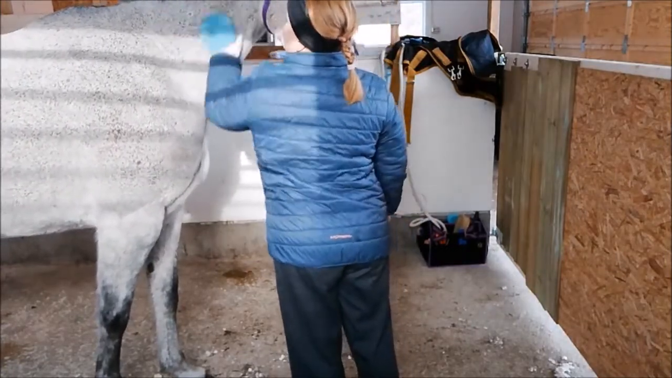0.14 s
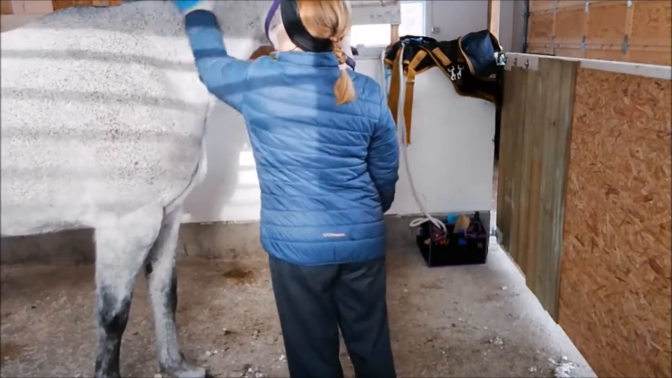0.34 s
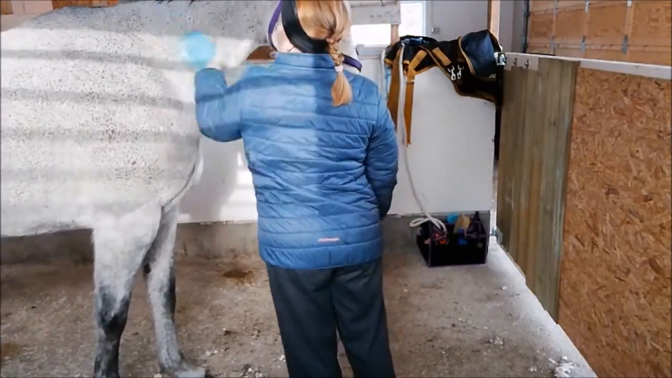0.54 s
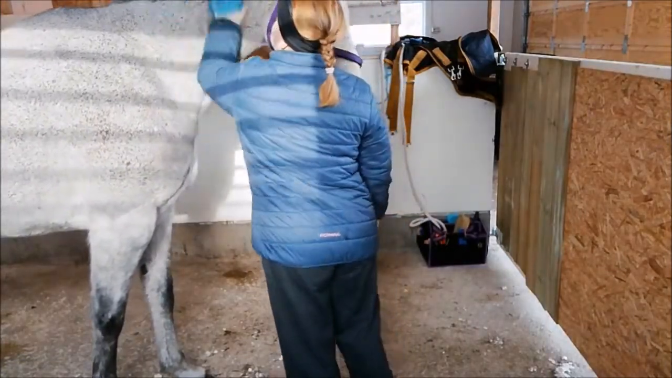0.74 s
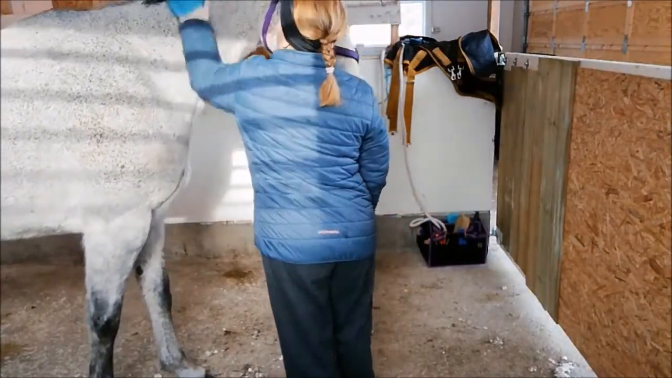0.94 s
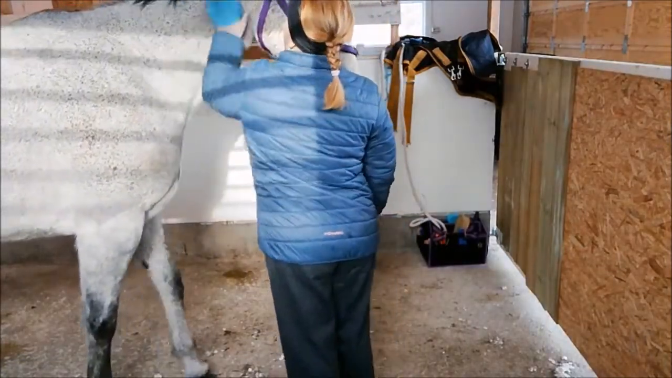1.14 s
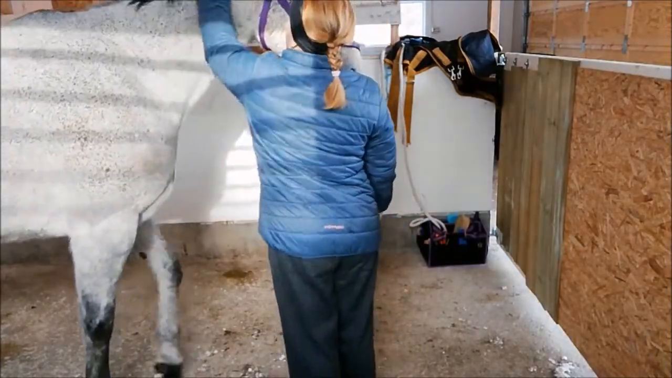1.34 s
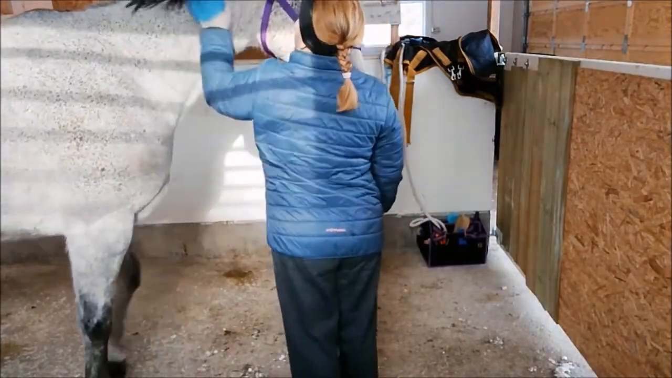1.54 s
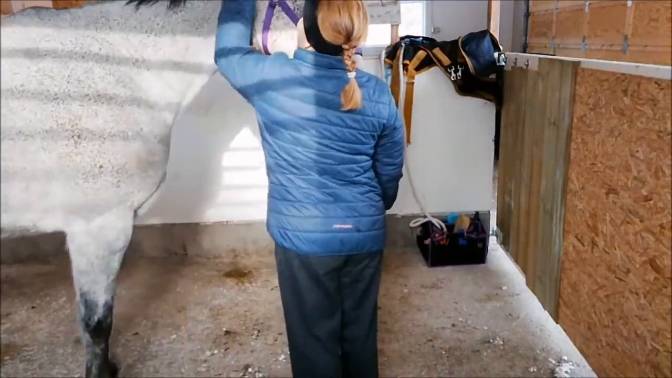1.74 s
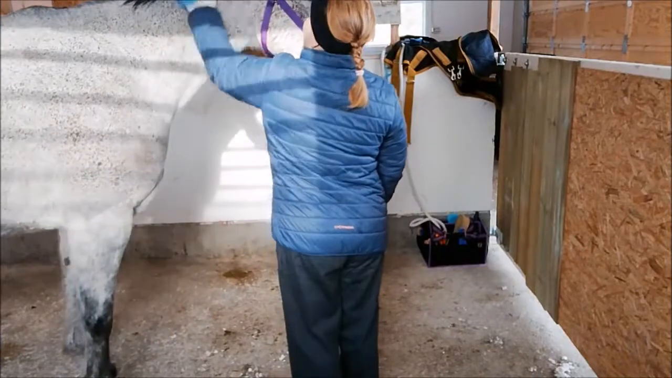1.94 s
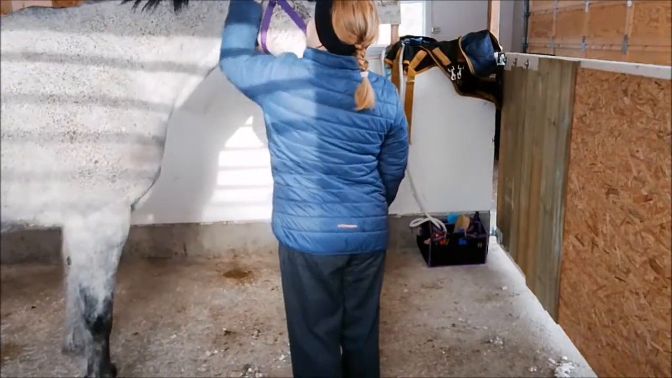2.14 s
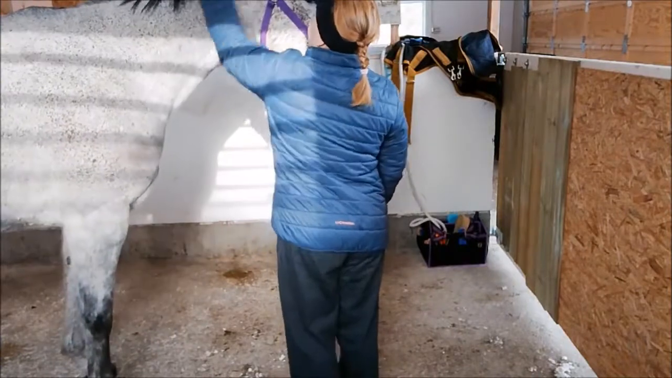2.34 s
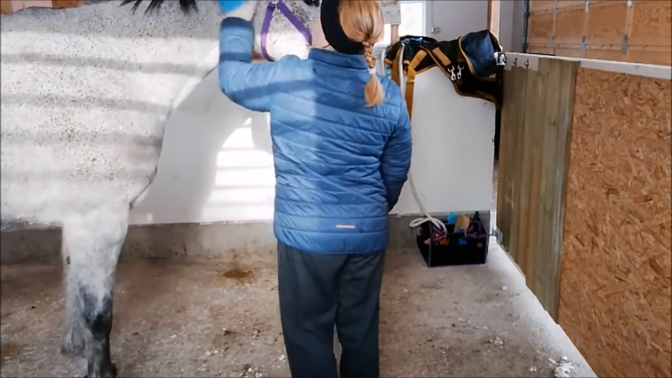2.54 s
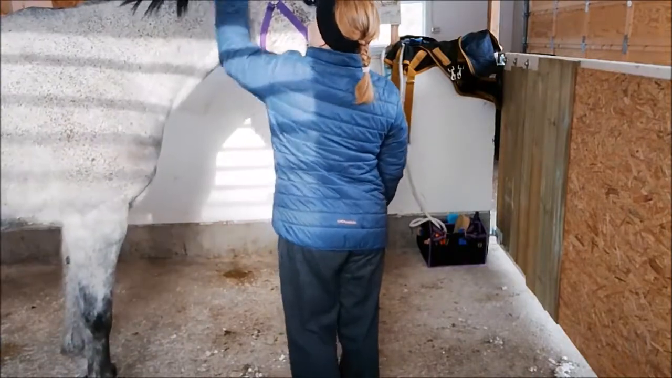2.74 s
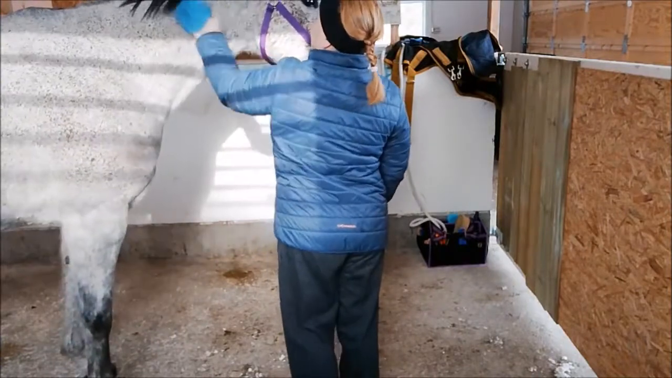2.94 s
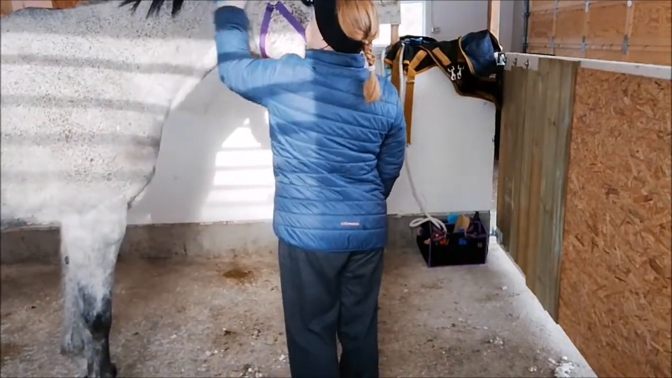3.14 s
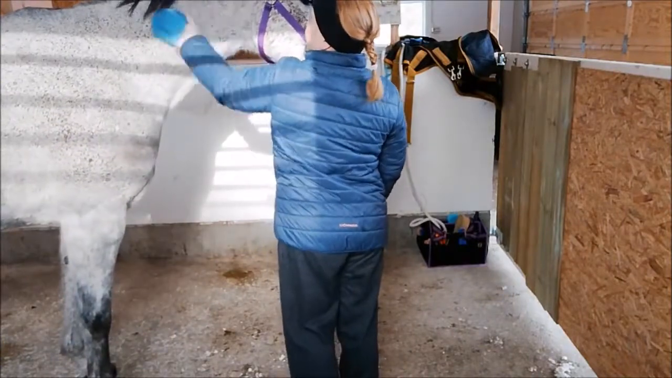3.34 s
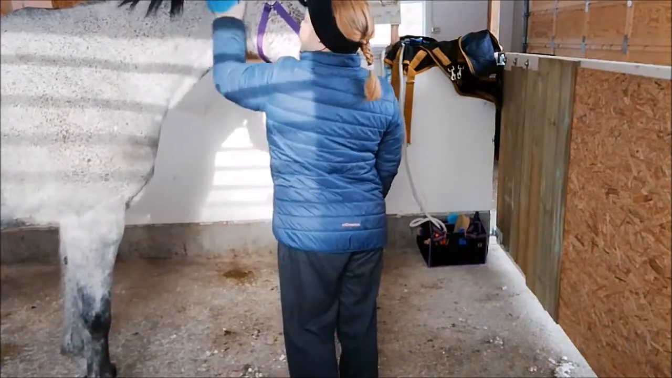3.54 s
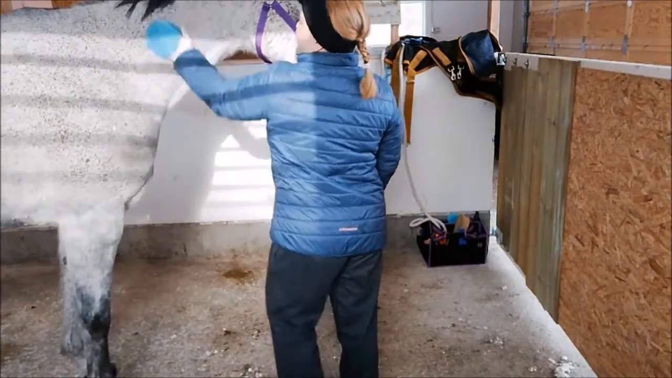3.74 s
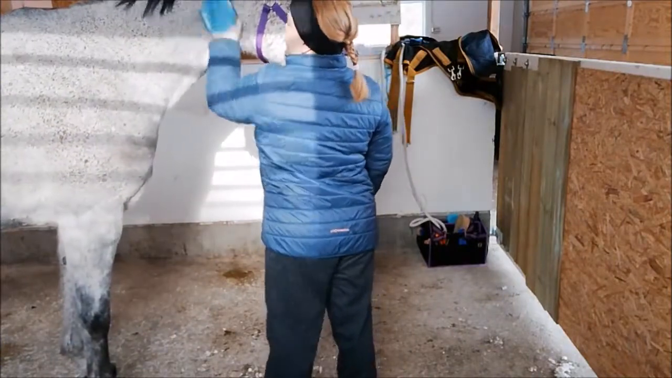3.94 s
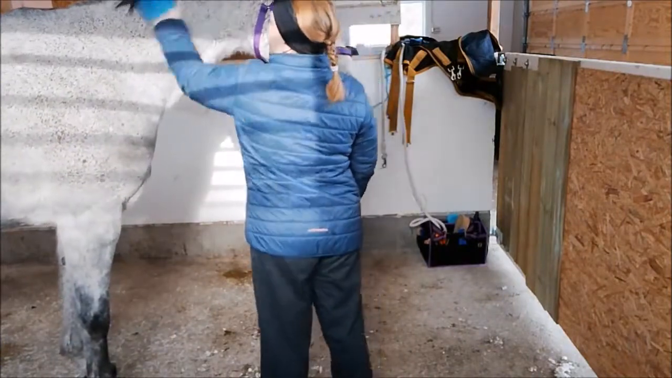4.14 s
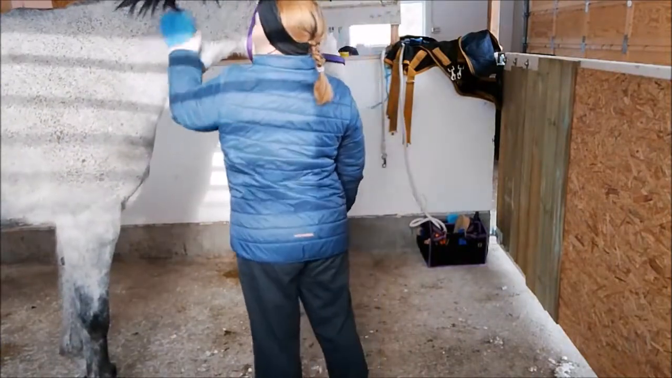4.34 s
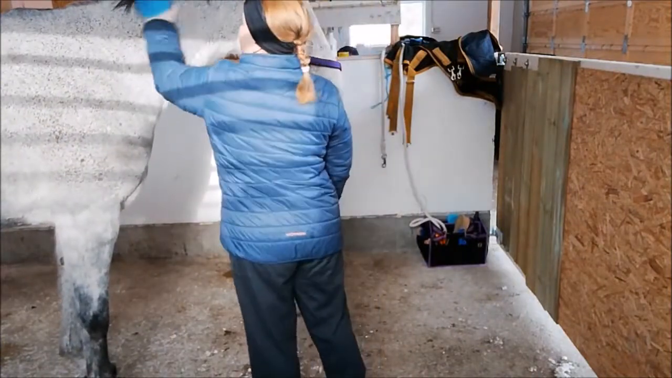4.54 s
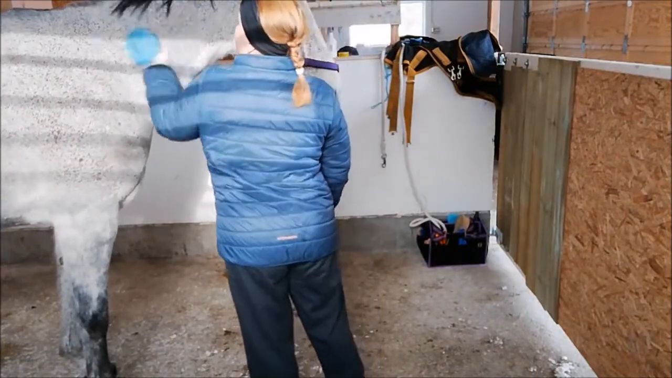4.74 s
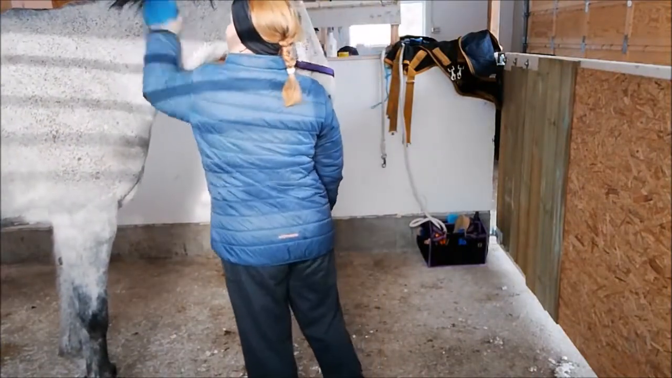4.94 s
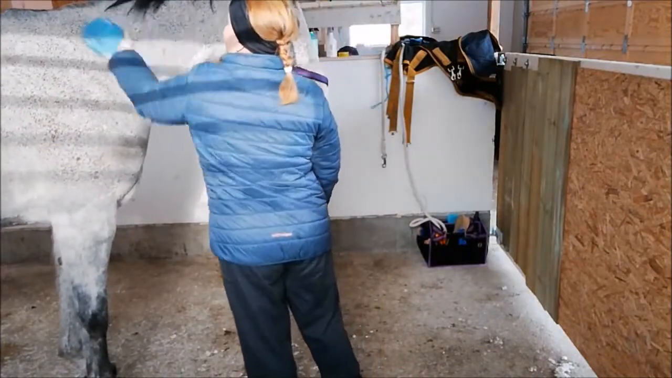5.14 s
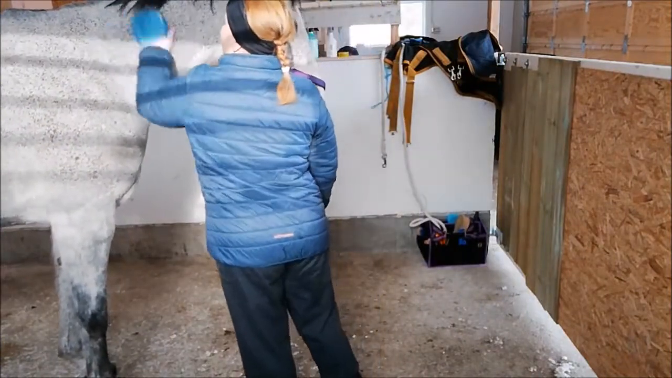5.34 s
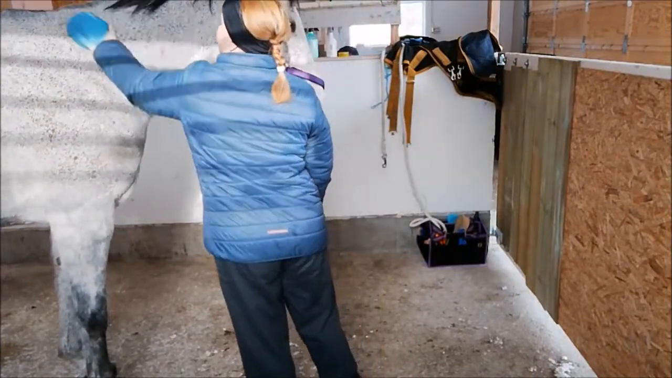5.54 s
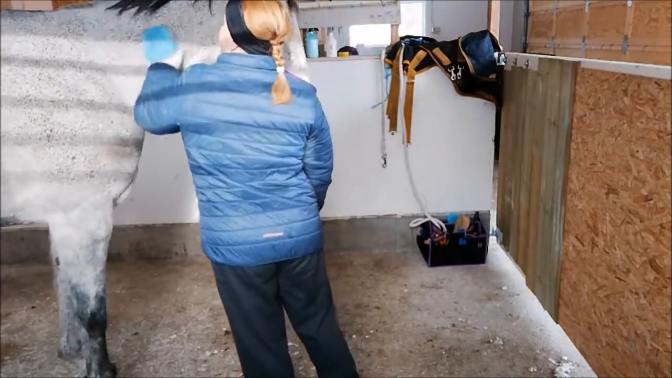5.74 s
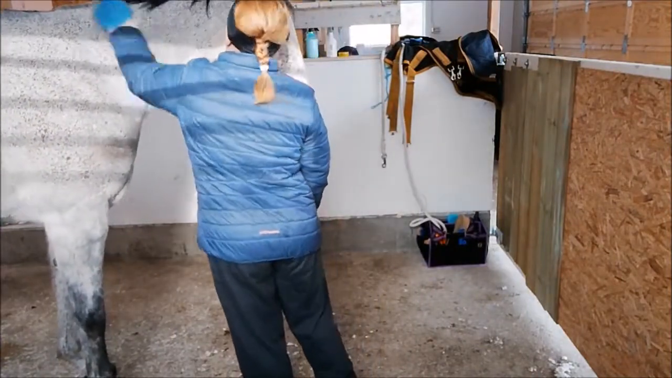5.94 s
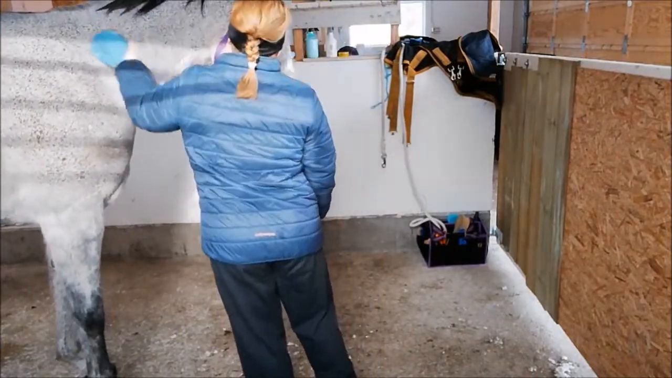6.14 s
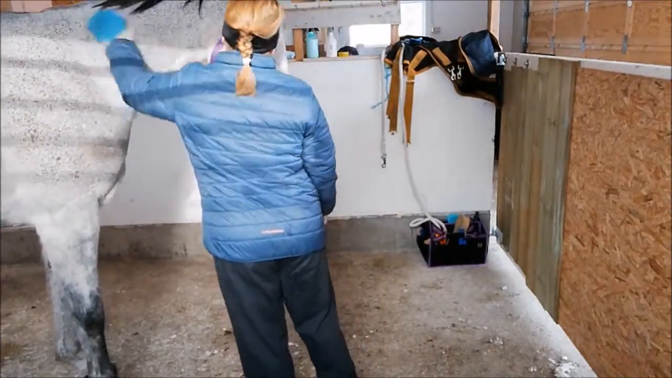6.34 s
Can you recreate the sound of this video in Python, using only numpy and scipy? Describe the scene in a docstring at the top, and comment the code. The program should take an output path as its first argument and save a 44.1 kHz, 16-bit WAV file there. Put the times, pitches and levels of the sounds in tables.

```python
"""Brushing a horse in a stable

A brush sweeps to and fro over a horse's neck, its bristles rubbing, rasping and hissing on the hair.
The horse shifts a front leg: the hoof scrapes over gritty concrete, stamps once and settles.
Later a boot scuffs the sandy floor and the bristles flick off the coat. The stall's walls echo."""
import sys
import numpy as np
from scipy import signal
from scipy.fft import rfft, irfft, next_fast_len
from scipy.io import wavfile

SR = 44100
rng = np.random.default_rng(int(sys.argv[2]) if len(sys.argv) > 2 else 0)


def store_pcm(level_fs):
    """Save levels as 16-bit WAV."""
    pcm = np.round(np.clip(level_fs, -1, 1) * 32767).astype(np.int16)
    wavfile.write(sys.argv[1], SR, np.atleast_2d(pcm).T)


N = 281358
T = np.arange(N) / SR


def amp(db):
    """Turn decibels into a number to multiply by."""
    return 10 ** (np.asarray(db) / 20)


def unit(x):
    """Scale a sound to an average (rms) size of 1."""
    return x / np.sqrt(np.mean(x ** 2) + 1e-20)


def along(points, hz):
    """Read between a table's (frequency, value) rows, on a scale of octaves."""
    f, values = np.transpose(points)
    return np.interp(np.log(hz + 1), np.log(f + 1), values)


def filtered(x, response):
    """Turn each frequency up or down by the factor response(hz)."""
    n = x.shape[-1]
    padded = next_fast_len(n + 8192)
    return irfft(rfft(x, padded) * response(np.fft.rfftfreq(padded, 1 / SR)), padded)[..., :n]


def coloured(x, spectrum):
    """Give a sound the tone colour in a table, at size 1."""
    return unit(filtered(x, lambda hz: amp(along(spectrum, hz))))


def swept(x, times, centres, octaves, peak_db):
    """Boost a narrow band that glides from pitch to pitch; the result has size 1."""
    hz, t, spectra = signal.stft(x, SR, nperseg=1024)
    distance = np.log2((hz[:, None] + 1) / np.interp(t, times, centres)) / octaves
    boost = amp(peak_db / (1 + distance ** 2))
    return unit(signal.istft(spectra * boost, SR, nperseg=1024)[1][:, :N])


def ringing(modes, rise):
    """One second of tones that swell, then fade; t60 is the time to fade by 60 dB."""
    t = np.arange(SR) / SR
    tones = sum(amp(db - 60 * t / t60) * np.sin(2 * np.pi * hz * t) for hz, db, t60 in modes)
    return (1 - np.exp(-t / rise)) ** 2 * tones


def press(start, rise, hold, release):
    """The pressure of a sliding touch, 0 to 1: it builds, holds and lets go."""
    return np.interp(T, start + np.cumsum([0, rise, hold, release]), [0, 1, 1, 0])


def add(track, start, sound):
    """Mix a sound into a track at a start time in seconds."""
    part = track[..., round(start * SR):][..., :sound.shape[-1]]
    part += sound[..., :part.shape[-1]]


# How alike left and right sound: f/Hz, likeness (1 the same, -1 opposite)
LIKENESS = [(60, .93), (200, 0.75), (380, 0.065), (700, -0.44), (1250, 0.52), (2300, -0.1), (4400, 0.02),
            (8000, -0.021)]
def paired(x):
    """Blend two unrelated signals into a partly alike left and right."""
    angle = lambda hz: np.arccos(np.clip(along(LIKENESS, hz), -1, 1)) / 2
    mid, side = filtered(x, lambda hz: np.array([np.cos(angle(hz)), np.sin(angle(hz))]))
    return np.array([mid + side, mid - side])


def grains(per_second):
    """A hail of tiny random clicks of uneven size."""
    hits = rng.random(N) < per_second / SR
    return unit(paired(hits * rng.standard_normal((2, N))))


# Tone colour of the quiet stable: f/Hz, level/dB (levels in all tables are relative)
AIR_COLOUR = [(20, -6.5), (50, 1.5), (100, -5), (250, -5.5), (450, -14), (1000, -10.5), (3000, -14),
              (6300, -31.5), (8000, -16), (15500, -22.5)]
def stable_air(level_db=-67):
    """A faint, steady rumble and hiss."""
    return amp(level_db) * coloured(paired(rng.standard_normal((2, N))), AIR_COLOUR)


# How long the stall echoes: f/Hz, t60/s
ECHO_FADE = [(100, .36), (250, .5), (600, .52), (1200, .52), (2500, .41), (5000, .33), (10000, .27)]
def echo(x, gap_s):
    """The walls throw a sound back after a short gap; each frequency fades at its own speed."""
    hz, t, spectra = signal.stft(rng.standard_normal((2, SR)), SR, nperseg=256)
    fade = amp(-60 * t / along(ECHO_FADE, hz)[:, None])
    tail = paired(signal.istft(spectra * fade, SR, nperseg=256)[1])
    tail *= np.clip(np.arange(tail.shape[1]) / SR / gap_s - 1, 0, 1)
    return signal.fftconvolve(x[:1], tail / np.linalg.norm(tail[0]), axes=1)[:, :N]


# Sand cracking underfoot: t/s, level/dB
SAND_SNAPS = [(3.991, -34.5), (4, -32), (4.014, -41), (4.033, -44), (4.044, -39.5), (6.085, -51)]
def sand_snaps(pitch_hz=2000, t60=.009):
    """Single grains snap under the boot, each with a tiny ping."""
    track, t = np.zeros((2, N)), np.arange(SR // 20) / SR
    for start, db in SAND_SNAPS:
        hz = pitch_hz * np.exp(0.12 * rng.standard_normal((2, 1)))
        add(track, start, amp(db - 60 * t / t60) * np.sin(2 * np.pi * hz * t))
    return track


# The boot's slide: rise/s, hold/s, release/s, level/dB
BOOT_SLIDE = (0.02, 0.04, 0.055, -47)
# Its tone colour: f/Hz, level/dB
BOOT_COLOUR = [(60, 1), (130, -9), (230, 3), (450, -4), (1000, -1.5), (1900, 2.5), (3000, -4), (5200, 0),
               (7000, -9.5), (9500, -26), (15000, -27)]
def boot_scuff(start_s=3.982):
    """A sole slides a little way over sand."""
    *shape, db = BOOT_SLIDE
    return amp(db) * press(start_s, *shape) * coloured(grains(per_second=6000), BOOT_COLOUR)


# Hoof drags: t/s, rise/s, hold/s, release/s, judder/dB, scrape/dB, grit/dB, judder f/Hz
HOOF_DRAGS = [ (0.721, 0.1, 0.015, 0.053, -37, -33, -38.5, 223.7),
              (0.991, 0.033, 0.008, 0.14, -48.5, -47, -45.5, 200),
              (1.248, 0.03, 0.0059, 0.1019, -45, -42.5, -45, 140),
              (1.571, 0.031, 0.053, 0.098, -38.5, -37, -36, 128), ]
# Where the dragged hoof rings: f/Hz, width/Hz, boost/dB
HOOF_RING = [(480, 35, 6), (635, 45, 2), (786, 35, 4), (955, 30, 4), (1088, 35, 8), (2080, 70, 4),
             (3820, 60, 5.5)]
# Tone colours of the judder, scrape and grit: f/Hz, level/dB
JUDDER_COLOUR = [(40, -21), (85, -7), (130, -0.5), (200, 3.5), (320, 5), (420, -11.5), (700, -32)]
SCRAPE_COLOUR = [(250, -31.5), (480, -0.5), (650, 1), (1100, 1), (1500, -10.5), (2200, -20.5), (3500, -33),
                 (7000, -44)]
GRIT_COLOUR = [(900, -18.5), (2000, 4.5), (3000, 1.5), (5000, -1), (7500, -7.5), (8400, -15), (9500, -38),
               (15000, -35.5)]
def hoof_drags():
    """A dragged hoof judders in coarse slips, scrapes in finer ones and crushes grit."""
    judder, scrape, grit = np.zeros((3, N))
    pitch = []
    for start, rise, hold, release, judder_db, scrape_db, grit_db, hz in HOOF_DRAGS:
        weight = press(start, rise, hold, release)
        judder += amp(judder_db) * weight
        scrape += amp(scrape_db) * weight ** 1.1
        grit += amp(grit_db) * weight ** 1.8  # grit breaks mostly under full weight
        pitch += [(start, hz), (start + rise + hold + release, hz)]
    ring = lambda f: amp(sum(db / (1 + (2 * (f - hz) / width) ** 2) for hz, width, db in HOOF_RING))
    slips = coloured(grains(per_second=1500), JUDDER_COLOUR)
    slips = swept(slips, *np.transpose(pitch), octaves=.2, peak_db=10)
    scraping = coloured(filtered(grains(per_second=1500), ring), SCRAPE_COLOUR)
    crushing = coloured(filtered(grains(per_second=3200), ring), GRIT_COLOUR)
    return amp(-2) * judder * slips + scrape * scraping + grit * crushing


# The hoof hits the floor: t/s, thud level/dB, thud f/Hz, clop level/dB
HOOF_HITS = [(0.733, -30.5, 222, -39), (0.754, -30.5, 229.3, -25), (0.778, -27.5, 225, -34),
             (0.823, -25.5, 235, -19), (0.852, -26, 220, -35.5), (1.268, -35, 150.8, -27),
             (1.345, -48, 150, -14.5), (1.352, 0.5, 189.5, -8), (1.368, -14, 231.7, -11),
             (1.379, -18, 130, -26.5), (1.412, -15.5, 139, -47), (1.672, -23, 125, -50),
             (1.955, -30, 120, -40.5)]
# Low tones of the stall that a heavy hit wakes: f/Hz, level/dB, t60/s
STALL_BOOM = [(138, -10, .3), (213, -21, .48), (258, -27, .5), (116, -22, .28), (168, -26, .36),
              (276, -28, .4), (341, -31, .35)]
def hoof_thuds(push_db=8, cycles=6.46, lowest_hz=72):
    """The leg's weight lands with one short, low push, then the stall booms."""
    push, boom = np.zeros((2, 2, N))
    low_tones = ringing(STALL_BOOM, rise=0.0256)
    for start, db, hz, _ in HOOF_HITS:
        add(push, start, amp(db) * ringing([(hz, push_db, cycles / hz)], rise=1 / hz))
        add(boom, start, amp(1.35 * db) * low_tones)  # light taps hardly shake the stall
    sound = push + amp(-8) * echo(push, gap_s=.008) + boom
    bass_cut = signal.butter(2, lowest_hz, "highpass", fs=SR, output="sos")
    return signal.sosfilt(bass_cut, sound)  # trim the deepest bass from the thud


# Tone colour of the hoof's rim on concrete: f/Hz, level/dB
CLOP_COLOUR = [(60, -22.5), (150, -8.5), (300, 9.5), (430, -16.5), (520, 1.5), (800, 1), (1000, -2),
               (1500, -4.5), (2100, -11), (2800, -13), (4200, -24), (7500, -33), (9500, -43),
               (15000, -50.5)]
def hoof_clops(roll_s=0.0068, t60=0.059):
    """The rim of the hoof rolls down onto the concrete in a few thousandths of a second."""
    track, t = np.zeros((2, N)), np.arange(SR // 4) / SR
    contact = np.minimum(t / roll_s, 1) * amp(-60 * np.maximum(t - roll_s, 0) / t60)
    for start, _, _, db in HOOF_HITS:
        noise = coloured(paired(rng.standard_normal((2, len(t)))), CLOP_COLOUR)
        add(track, start, amp(db - 10) * contact * noise)
    return track


# Clear tones between the walls: f/Hz, level/dB, t60/s
WALL_TONES = [(640, -16, .45), (785, -6, .36), (866, -9, .42), (978, -16, .4), (1033, -17, .4),
              (1180, -24, .45), (1283, -20, .25), (1380, -21, .33), (1487, -28, .3), (1738, -28, .35),
              (1767, -27, .25)]
def wall_ring(right_delay_s=0.0005945):
    """Each clop leaves tones ringing between the walls; they reach the farther, right ear later."""
    track = np.zeros((2, N))
    for start, _, _, clop_db in HOOF_HITS:
        for ear, delay in zip(track, (0, right_delay_s)):
            tones = [(hz, db + rng.normal(0, 0.67), t60) for hz, db, t60 in WALL_TONES]
            add(ear, start + delay, amp(clop_db - 3) * ringing(tones, rise=.005))
    return track


# The bristles' flick: rise/s, hold/s, release/s, level/dB
BRISTLE_FLICK = (0.004, 0.032, 0.06, -53.5)
# Its tone colour: f/Hz, level/dB
BRISTLE_COLOUR = [(40, 5), (110, 2), (400, -5), (800, 0), (1900, -7), (2800, -17), (5200, 3.5),
                  (9000, -4.5), (15500, -13.5)]
def bristle_flick(start_s=6.083):
    """The bristles spring free at the end of a stroke."""
    *shape, db = BRISTLE_FLICK
    return amp(db) * press(start_s, *shape) * coloured(grains(per_second=10000), BRISTLE_COLOUR)


# Strokes to and fro: t/s, length/s, rub/dB, rasp/dB, hiss/dB, rub f/Hz, rasp f/Hz
BRUSH_STROKES = [ (-0.1, 0.2, -68.5, -76, -68.5, 1360, 2100), (0.056, 0.33, -67, -67, -64.5, 1516, 2150),
                 (0.274, 0.28, -68, -71, -58.5, 1493, 2400), (0.508, 0.35, -66, -66.5, -63, 1400, 2450),
                 (0.95, 0.41, -67, -64.5, -67, 1500, 2450), (1.448, 0.2, -77, -81, -59.5, 1495, 2300),
                 (1.851, 0.18, -81, -71, -67, 1374, 2250), (2.05, 0.32, -68.5, -67.5, -65, 1500, 2250),
                 (2.34, 0.18, -68, -69, -65.5, 1446, 2250), (2.53, 0.23, -70.5, -65.5, -65.5, 1450, 2205),
                 (2.79, 0.23, -66.5, -62, -64.5, 1600, 2120), (3.04, 0.14, -66.5, -64.5, -64, 1490, 2030),
                 (3.247, 0.17, -63, -61, -62.5, 1505, 1960), (3.464, 0.17, -62, -61.5, -60, 1584, 2200),
                 (3.68, 0.2, -58.5, -59, -62, 1429, 2120), (3.87, 0.25, -66.5, -61, -63.5, 1470, 2300),
                 (4.048, 0.28, -67.5, -66, -64, 1527, 2060), (4.379, 0.18, -66.5, -63, -66.5, 1564, 2350),
                 (4.54, 0.286, -72, -69, -67.5, 1540, 2350), (4.823, 0.18, -67, -64.5, -66, 1470, 2400),
                 (4.974, 0.28, -72, -66.5, -66, 1473, 2150), (5.247, 0.2596, -67.5, -70, -66.5, 1518, 2150),
                 (5.46, 0.19, -71.5, -72, -66, 1460, 2400), (5.704, 0.23, -63, -61.5, -63, 1464, 2150),
                 (5.912, 0.232, -67.5, -64.5, -64, 1680, 1900), (6.157, 0.24, -63, -69.5, -65, 1460, 2100),
                 ]
# The faint sound that stays while the hand turns round: rub/dB, rasp/dB, hiss/dB
BRUSH_REST = (-76.5, -80, -70)
# Tone colours of the hollow rub, the rasp and the bristle tips' hiss: f/Hz, level/dB
RUB_COLOUR = [(150, -6), (350, -8.5), (600, -11), (850, -11.5), (1200, 2.5), (1650, 0.5), (2000, -6.5),
              (4000, -30.5)]
RASP_COLOUR = [(1400, -22), (1800, 2), (2050, -1.5), (2400, -2), (2800, -5.5), (3700, -0.5), (6000, -31)]
HISS_COLOUR = [(1200, -31), (2500, -1.5), (3600, -3), (5200, 2), (7000, -1), (8500, -9), (10500, -13),
               (15500, -12.5)]
# Which side the brush is louder on: f/Hz, left minus right/dB
BRUSH_BALANCE = [(500, -0.5), (850, 5.5), (1500, -2), (2200, -0.5), (2600, 5), (3600, 4), (5200, 1),
                 (7500, -3.5), (11000, -2.5)]
def brush(speed_power=0.65, rub_octaves=0.18, rasp_octaves=-0.03):
    """Bristles slip over hair: rub, rasp and hiss swell and fade with the speed of the hand."""
    power = amp(BRUSH_REST)[:, None] ** 2 * np.ones(N)
    glide = []
    for start, length, *levels, rub_hz, rasp_hz in BRUSH_STROKES:
        during = (T > start) & (T < start + length)
        speed = np.sin(np.pi * (T[during] - start) / length)
        power[:, during] += (amp(levels)[:, None] * speed ** speed_power) ** 2
        for offset in (-1 / 3, 1 / 3):  # the pitches glide around mid-stroke as the brush tilts
            when = start + length * (.5 + offset)
            glide.append((when, rub_hz * 2 ** (rub_octaves * offset),
                          rasp_hz * 2 ** (rasp_octaves * offset)))
    rub_swell, rasp_swell, hiss_swell = np.sqrt(power)
    times, rub_pitch, rasp_pitch = np.transpose(sorted(glide))
    rub = coloured(grains(per_second=7000), RUB_COLOUR)
    rub = swept(rub, times, rub_pitch, octaves=.09, peak_db=10)
    rasp = coloured(grains(per_second=6000), RASP_COLOUR)
    rasp = swept(rasp, times, rasp_pitch, octaves=.07, peak_db=9.5)
    hiss = coloured(grains(per_second=12000), HISS_COLOUR)
    sound = amp(1) * rub_swell * rub + amp(1.5) * rasp_swell * rasp + amp(3) * hiss_swell * hiss
    return filtered(sound, lambda hz: amp(along(BRUSH_BALANCE, hz) * np.array([[.5], [-.5]])))


def scene():
    """The brush is close by; the hoof is farther off, with more echo, and a little to the left."""
    drags, clops = hoof_drags(), hoof_clops()
    bristles = brush() + bristle_flick()
    boot = boot_scuff() + sand_snaps()
    knocks = amp(1.5) * clops + amp(-1.5) * echo(clops, gap_s=.005)
    scrapes = amp(-0.5) * drags + amp(-4) * echo(drags, gap_s=0.0015)
    grooming = amp(2.5) * bristles + amp(-10) * echo(bristles, gap_s=0.0023)
    footstep = boot + amp(-4.5) * echo(boot, gap_s=0.0055)
    lean_left = amp([[.9], [-.9]])
    hoof = (knocks + scrapes) * lean_left + wall_ring() + hoof_thuds()
    return stable_air() + footstep + hoof + grooming


def record(dry, top_hz=15800):
    """Cut away the very highest treble."""
    return filtered(dry, lambda hz: hz < top_hz)


dry = scene()
out = record(dry)
store_pcm(out)
```